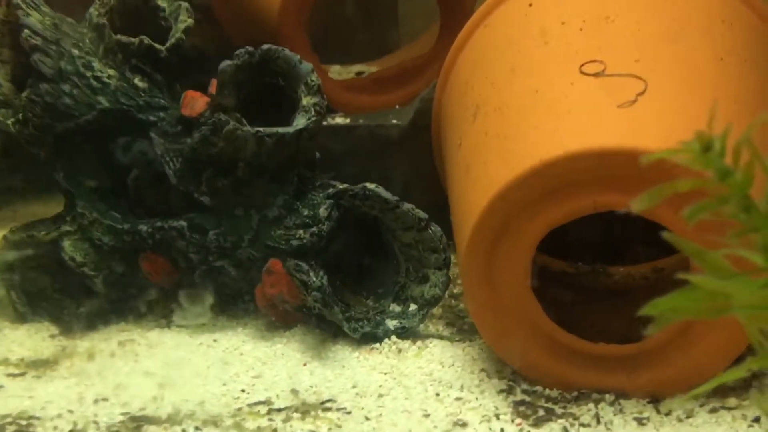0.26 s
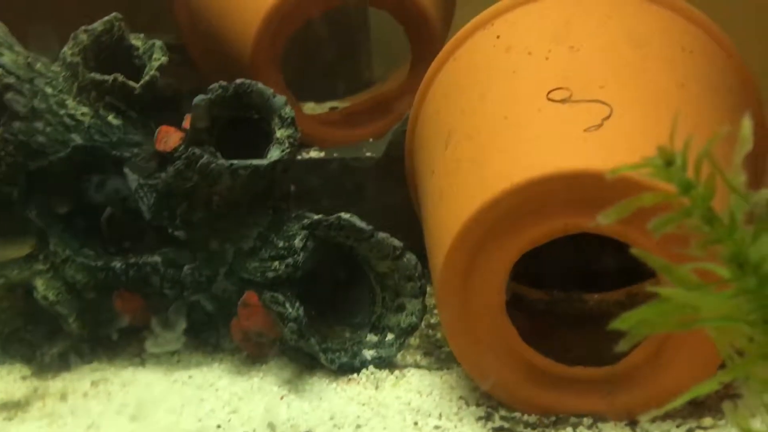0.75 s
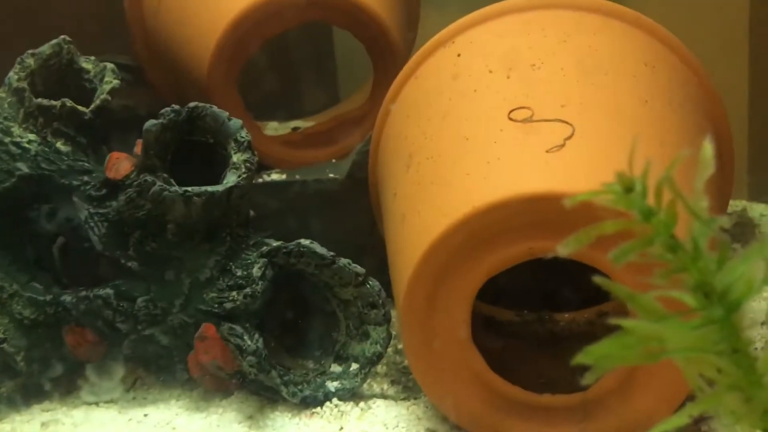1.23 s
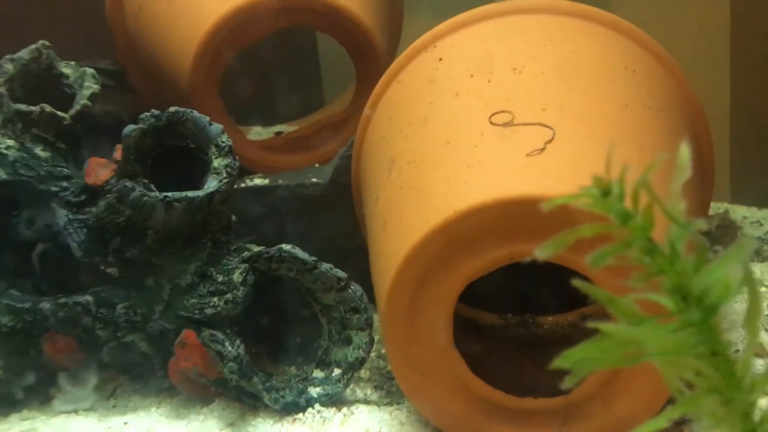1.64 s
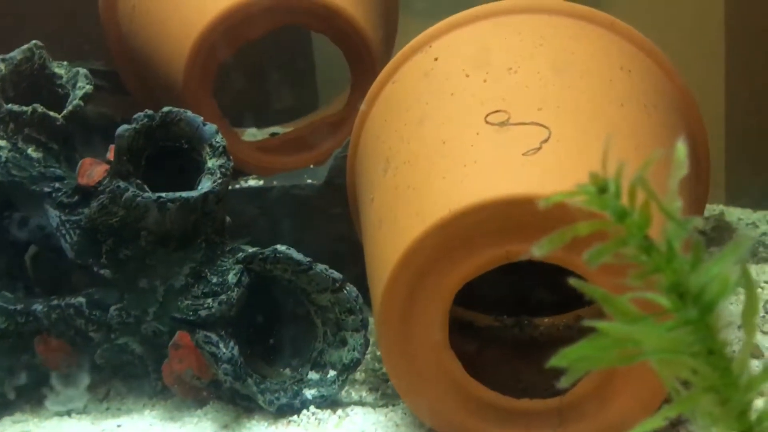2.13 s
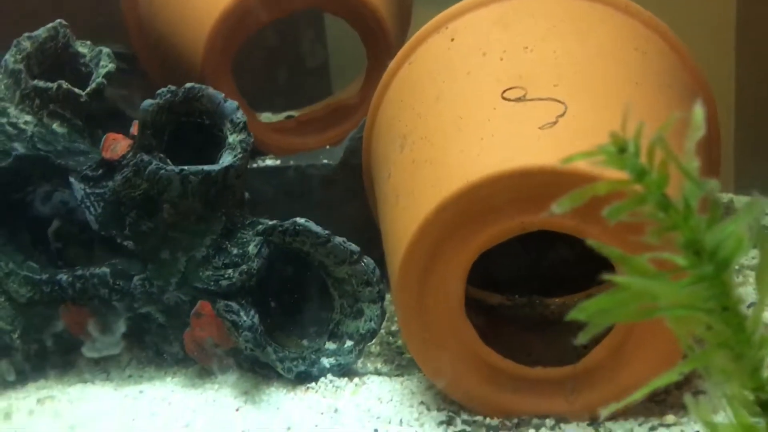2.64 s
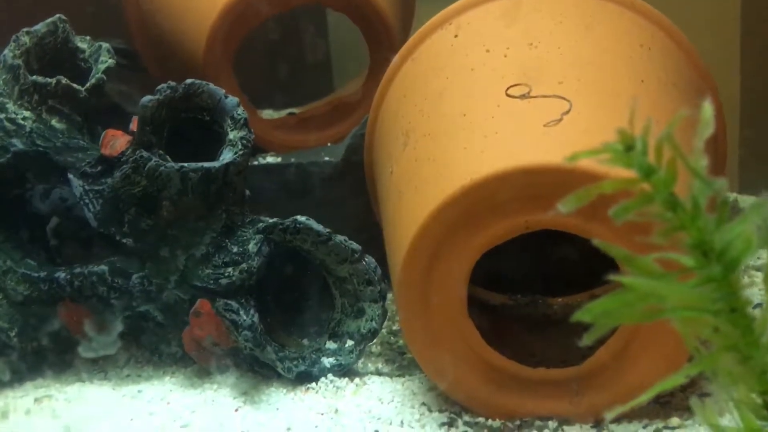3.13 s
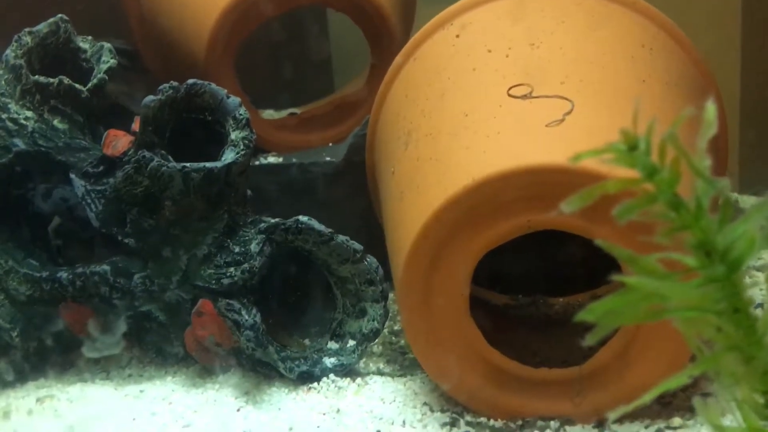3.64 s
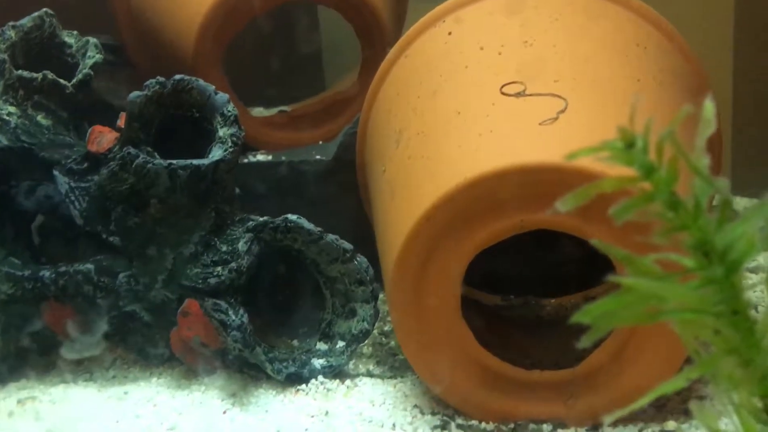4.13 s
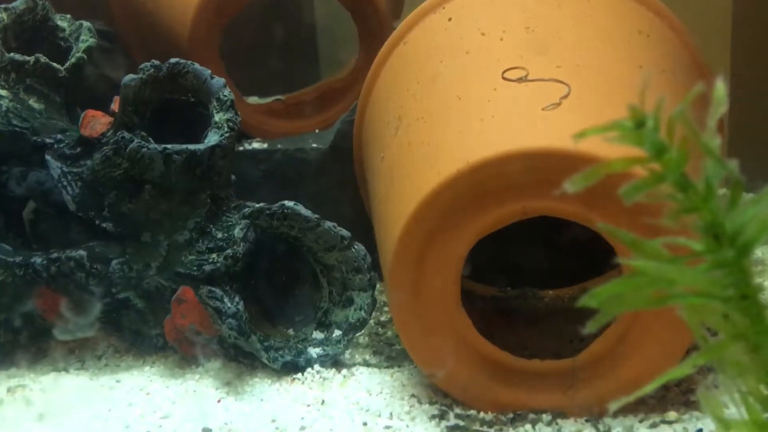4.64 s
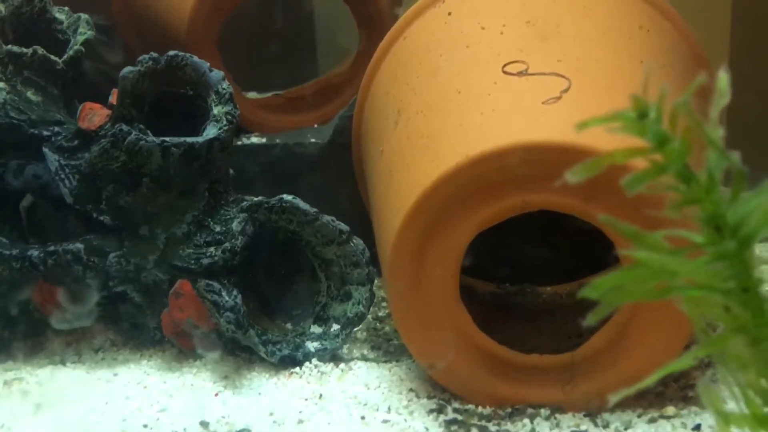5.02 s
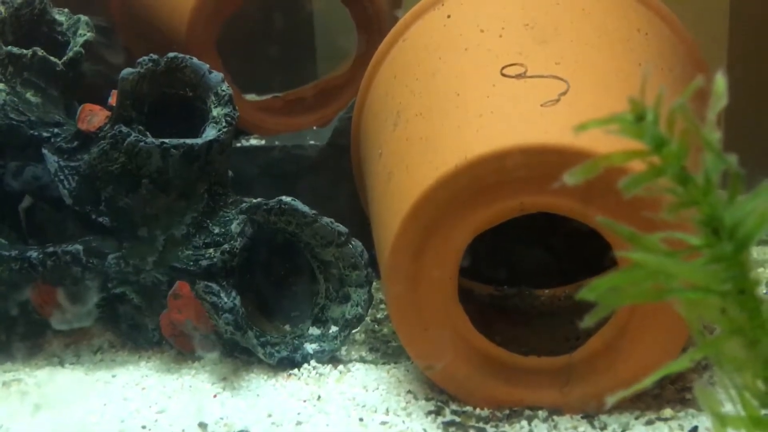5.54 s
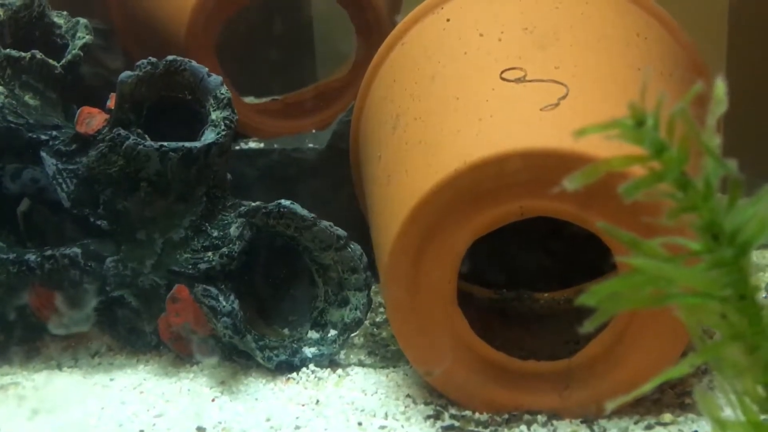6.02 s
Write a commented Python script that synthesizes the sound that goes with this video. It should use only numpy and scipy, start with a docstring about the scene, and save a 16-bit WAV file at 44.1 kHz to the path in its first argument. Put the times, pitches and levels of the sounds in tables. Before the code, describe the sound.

An aquarium filter pump gives a steady, low electric hum in a quiet room, heard from just in front of the glass. A thin whine, fine buzz and faint rotor chatter sit on top, while water flows softly through the filter. A soft low bump comes near the start and two weaker ones later. In the second half, a few tiny bubbles and crisp ticks pop faintly over the unchanging hum.

```python
"""A steady low hum fills a quiet room: an aquarium filter pump, heard from just in front of the glass.
Its rotor turns in step with the mains, shakes housing and tank once a turn and chatters faintly on
its shaft, with a thin whine and buzz on top. Water flows softly through the filter, with a few tiny
bubbles and ticks and some soft low bumps. Another motor drones faintly underneath."""
import sys
import numpy as np
from scipy.fft import rfft, irfft, next_fast_len
from scipy.io import wavfile
from scipy.ndimage import map_coordinates

SR = 44100
rng = np.random.default_rng(int(sys.argv[2]) if len(sys.argv) > 2 else 0)


def digitize_waveform(pressure):
    """Quantize a signal to 16-bit integers and store it at the path in sys.argv[1].

    Rows of a 2-D input are taken as channels; values are limited to [-1, 1].
    """
    field = np.atleast_2d(pressure).T
    bounded = np.clip(field, -1, 1)
    quanta = np.round(bounded * 32767).astype(np.int16)
    wavfile.write(sys.argv[1], SR, quanta)


N = 276546
TIME = np.arange(N) / SR
MAINS_HZ = 50.013  # also the rotor's turns a second


# The hum's strong tones: multiple of the rotor speed, level/dB added to base_db
STRONG_TONES = [(1, -17), (2, 0.5), (3, -7), (4, -12), (5, -6), (6, -24), (7, -2.5), (8, -2), (9, -1.5),
                (10, -6.5), (11, -16.5), (12, -21.5), (13, -18), (14, -19), (15, -14.5), (16, -20),
                (17, -10.5), (18, -8), (19, -9.5)]
# Outline of the weak overtones above them: f/Hz, level/dB
WEAK_TONES = [(1000, -87), (1120, -78), (1300, -80.5), (1550, -87), (1600, -82), (1650, -85), (1860, -94.5),
              (2000, -84), (2100, -80), (2150, -76.5), (2225, -97), (2350, -85.5)]
# How far the knock's tones stray out of step: f/Hz, scatter/cycles
KNOCK_BLUR = [(340, .04), (550, .04), (650, .25), (1750, .2), (1950, .05)]

def hum(base_db=-54, even_db=3, uneven_db=1.0, waver_db=0.53, panel_low_hz=725, panel_high_hz=1025):
    """The rotor knocks once a turn, a housing panel rings between knocks, and the magnet drones."""
    multiple = np.arange(1, 48)
    hz = multiple * MAINS_HZ
    level_db = along(WEAK_TONES, hz) + uneven_db * rng.standard_normal(len(hz))
    level_db += even_db * (-1) ** multiple  # the magnet pulls twice a turn, favouring even overtones
    level_db[:len(STRONG_TONES)] = base_db + np.transpose(STRONG_TONES)[1]
    knock_turn, panel_turn = .505, .1375  # when each comes within the turn
    knock_lag = multiple * knock_turn + along(KNOCK_BLUR, hz) * rng.standard_normal(len(hz))
    from_middle = (hz - (panel_low_hz + panel_high_hz) / 2) / MAINS_HZ
    panel_lag = multiple * panel_turn + .11 * from_middle ** 2  # outer tones fall out of step
    lag = np.where((hz > panel_low_hz) & (hz < panel_high_hz), panel_lag, knock_lag)
    # the magnet's drone comes before the knock, the tank's low boom after it
    lag += np.where(multiple == 2, -.28, .09 * (hz < 325))
    # each stroke pulls the wall inward, so the knock is a dip in pressure
    return -sum(amp(db + waver_db * wobble(5)) * tone(f, cycles)
                for f, db, cycles in zip(hz, level_db, lag))


# Thin whistling tones: f/Hz (rounded below to a rotor multiple), level/dB
WHINE_TONES = [(3752, -92.5), (3849, -88.5), (3903, -90), (4404, -88.5), (4452, -91), (4500, -87.5),
               (4549, -91.5), (4802, -87), (5249, -89.5)]
# Their boost over time: t/s, level/dB
WHINE_BOOST = [(0.0, 3.5), (1.2, 0), (3.5, 0), (5.2, -0.5), (6.27, .5)]

def whine(waver_db=0.5, at_turn=.45):
    """A few high multiples of the rotor speed sizzle together once a turn, each wavering in strength."""
    boost_db = np.interp(TIME, *np.transpose(WHINE_BOOST))
    sound = np.zeros(N)
    for hz, db in WHINE_TONES:
        multiple = round(hz / MAINS_HZ)
        gain = amp(db + boost_db + waver_db * wobble(3.6))
        sound += gain * tone(multiple * MAINS_HZ, multiple * at_turn)
    return sound


# Rubs and ticks in every turn: moment/turns, length/turns, f/Hz, width/Hz, level/dB
SHAFT_CONTACTS = [(0.46, 0.089, 414, 144, -72), (0.21, 0.3, 900, 100, -74), (0.33, 0.16, 2100, 380, -81),
                  (0.42, 0.014, 4750, 1900, -89), (0.461, 0.046, 3900, 680, -86),
                  (0.78, 0.063, 5700, 7100, -83.5), (0.95, 0.0097, 5760, 990, -85.5),
                  (0.8, 0.035, 9400, 17000, -89)]
# Boost for the high ticks: t/s, level/dB
TICK_BOOST = [(0.0, 3.5), (6.27, 0)]

def chatter(uneven_db=2.5, ticks_above_hz=3000):
    """The rotor rubs and ticks at fixed points of its turn, never twice with the same force."""
    boost_db = np.interp(TIME, *np.transpose(TICK_BOOST))
    sound = np.zeros(N)
    for moment, length, hz, width_hz, db in SHAFT_CONTACTS:
        onset = moment - MAINS_HZ * 2 / (np.pi * width_hz)  # a narrow resonance needs time to swell
        turns_away = (TIME * MAINS_HZ - onset + .5) % 1 - .5
        force = np.exp(-(turns_away / length) ** 2 / 2) * amp(uneven_db * wobble(35))
        rub = resonance(force * rng.standard_normal(N), hz, width_hz)
        sound += amp(db + boost_db * (hz > ticks_above_hz)) * unit(rub)
    return sound


# Outline of the faint tones above the hum: f/Hz, level/dB
BUZZ_TONES = [(2400, -95.5), (2900, -99), (3900, -94.5), (4500, -99), (5500, -98.5), (7000, -100),
              (9000, -105)]

def buzz(low_hz=2375, high_hz=9000, uneven_db=3.5, drift_radians=0.62):
    """A fine rasp repeats every turn and slowly changes its shape as the rotor settles."""
    size = 2048  # points in one turn
    hz = np.arange(size // 2 + 1) * MAINS_HZ
    gains = amp(along(BUZZ_TONES, hz) + uneven_db * rng.standard_normal(len(hz)))
    gains *= (hz > low_hz) & (hz < high_hz)
    phases = np.exp(2j * np.pi * rng.random((2, len(hz))))
    shapes = irfft(gains * phases) * size / np.sqrt(2)
    rasp_a, rasp_b = [np.interp(TIME * MAINS_HZ % 1, np.arange(size) / size, shape) for shape in shapes]
    blend = drift_radians * wobble(2.02)
    return rasp_a * np.cos(blend) + rasp_b * np.sin(blend)


# Water moving through the filter: f/Hz, level/dB per Hz
WATER_FLOW = [(20, -103), (45, -84), (70, -84.5), (130, -80.5), (200, -90), (330, -89.5), (450, -89),
              (700, -92), (900, -90.5), (1100, -97), (1600, -102), (2300, -106), (3200, -125)]
# The fine hiss over it: f/Hz, level/dB per Hz
WATER_HISS = [(1500, -125), (2700, -110.6), (4200, -109.3), (4900, -111.1), (6300, -108.6), (7700, -112.7),
              (8800, -112.1), (10400, -115.8), (11300, -115.4), (13000, -116.0), (15300, -120.2)]
# Another motor's faint drone (47 and 80 Hz), then the tank's ringing pitches: f/Hz, width/Hz, level/dB
DRONE_AND_TANK = [(47, 5.8, -71.5), (79.6, 4, -73.5), (240, 57, -71), (395, 45, -68.5), (530.3, 27, -69.5),
                  (608.7, 29, -70), (650, 33, -72), (733, 72, -75)]

def water_and_drone(gain_db=-1, swirl_db=0.47, stir_db=1.5, flicker_db=0.9):
    """A soft flow sets the tank ringing under a restless hiss, while another motor drones faintly."""
    bands = sum(amp(db + stir_db * wobble(6.6)) * unit(resonance(rng.standard_normal(N), hz, width_hz))
                for hz, width_hz, db in DRONE_AND_TANK)
    murmur = (noise(WATER_FLOW) + bands) * amp(gain_db + swirl_db * wobble(11))
    hiss = noise(WATER_HISS) * amp(gain_db + flicker_db * wobble(14))
    return murmur + hiss


# Clear little bubbles: t/s, peak level/dB before clear_db is added, f/Hz
BUBBLE_PINGS = [(2.1824, -63, 6420), (3.0899, -58, 6300), (3.7015, -56, 6350), (3.8671, -53.5, 6260),
                (4.558, -56, 6860), (5.6196, -55, 6340)]

def bubbles(clear_db=-2, width_hz=830, ring_s=0.023, faint_per_s=4, faint_db=-71, faint_hz=6400):
    """Tiny bubbles burst with a high ping: a few clear ones, and many faint ones at random."""
    draws = rng.random((round(faint_per_s * N / SR), 2))
    faint = [(when * TIME[-1], faint_db, faint_hz * 2 ** ((pitch - .5) / 2)) for when, pitch in draws]
    return amp(clear_db) * bursts(BUBBLE_PINGS, width_hz, ring_s) + bursts(faint, width_hz, ring_s)


# Crisp ticks in the water: t/s, peak level/dB, f/Hz
WATER_TICKS = [(3.2382, -51, 4400), (3.416, -58, 5200), (3.9376, -62, 14000), (5.2865, -62, 12500),
               (5.6487, -55, 13500), (5.663, -55, 8060)]

def ticks():
    """Ticks are shorter than the bubbles and have a less clear pitch."""
    return bursts(WATER_TICKS, width_hz=3800, ring_s=.02)


# Soft low bumps: t/s, peak level/dB, f/Hz, ring time/s
LOW_BUMPS = [(.06, -54, 46, .8), (.583, -45, 138, .07), (2.312, -52, 135, .06), (3.629, -54, 135, .06)]

def bumps(rise_share=.2):
    """Soft pushes swell, then ring away on a low note."""
    sound, t = np.zeros(N + SR), np.arange(SR) / SR
    for start, db, hz, ring_s in LOW_BUMPS:
        swell = 1 - np.exp(-t / (rise_share * ring_s))
        ring = np.sin(2 * np.pi * hz * t) * swell * np.exp(-np.log(1000) * t / ring_s)
        sound[round(start * SR):][:len(t)] += amp(db) * ring / np.abs(ring).max()
    return sound[:N]


def bursts(events, width_hz, ring_s):
    """Each event is a puff of noise that fades by 60 dB in ring_s and rings around its own pitch."""
    sound, t = np.zeros(N + SR), np.arange(SR // 10) / SR
    for start, db, hz in events:
        puff = rng.standard_normal(len(t)) * np.exp(-np.log(1000) * t / ring_s)
        ring = resonance(puff, hz, width_hz)
        sound[round(start * SR):][:len(t)] += amp(db) * ring / np.abs(ring).max()
    return sound[:N]


def amp(db):
    """Turn decibels into a gain."""
    return 10 ** (np.asarray(db) / 20)


def unit(x):
    """Scale x to an average strength (rms) of 1."""
    return x / np.sqrt(np.mean(x ** 2) + 1e-20)


def along(points, hz):
    """Read between (f/Hz, value) points on a log frequency axis."""
    f, values = np.transpose(points)
    return np.interp(np.log(hz + 1), np.log(f + 1), values)


def wobble(per_s):
    """A smooth curve of strength about 1, through per_s random points a second."""
    points = rng.standard_normal(int(N * per_s / SR) + 4)
    coarse = TIME[::64]
    return np.interp(TIME, coarse, map_coordinates(points, [coarse * per_s]))


def tone(hz, lag):
    """A steady tone of strength 1, late by lag cycles."""
    return np.sqrt(2) * np.cos(2 * np.pi * (hz * TIME - lag))


def filtered(x, response):
    """Multiply each frequency in x by response(frequency)."""
    size = next_fast_len(len(x) + SR // 4)
    return irfft(rfft(x, size) * response(np.fft.rfftfreq(size, 1 / SR)), size)[:len(x)]


def resonance(x, hz, width_hz):
    """Make x ring around hz, cutting steeply on both sides."""
    return filtered(x, lambda f: (1j * f * width_hz / (hz * hz - f * f + 1j * f * width_hz)) ** 2)


def noise(spectrum):
    """Noise with the given level per Hz."""
    return filtered(rng.standard_normal(N), lambda hz: amp(along(spectrum, hz)) * np.sqrt(SR / 2))


def scene():
    """Pump, water and background together in one channel."""
    pump = hum() + whine() + chatter() + buzz()
    return (pump + water_and_drone() + bubbles() + ticks() + bumps())[None]


def record(dry):
    """Cut away the very highest treble."""
    return np.array([filtered(channel, lambda hz: hz < 15740) for channel in dry])


dry = scene()
out = record(dry)
digitize_waveform(out)
```